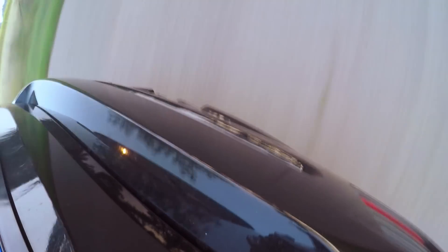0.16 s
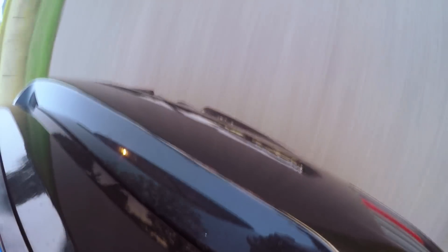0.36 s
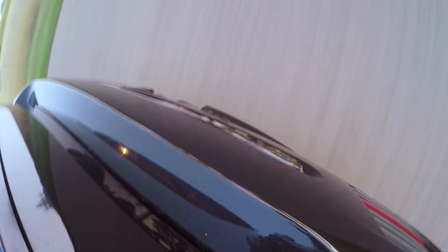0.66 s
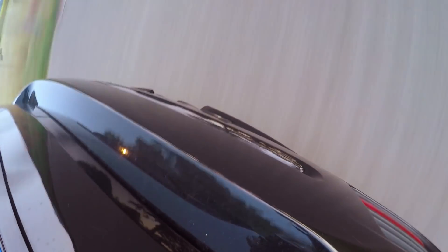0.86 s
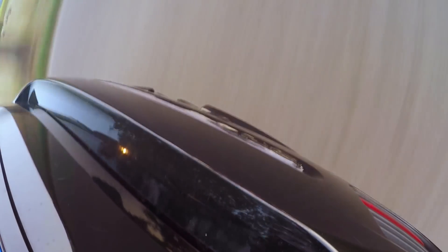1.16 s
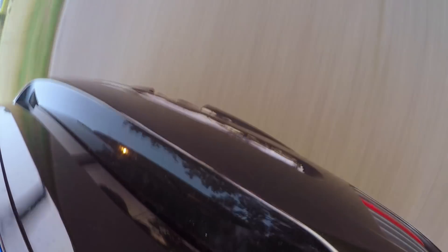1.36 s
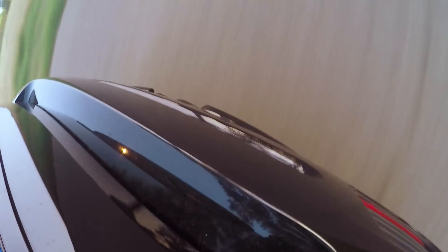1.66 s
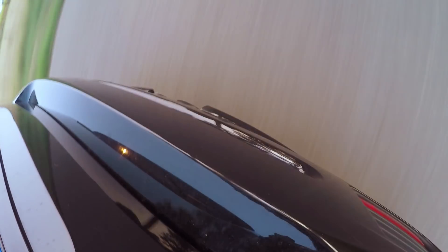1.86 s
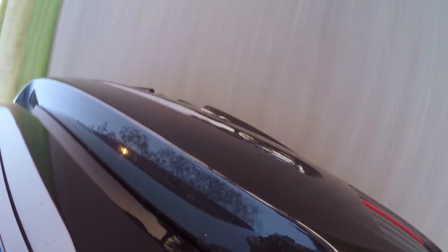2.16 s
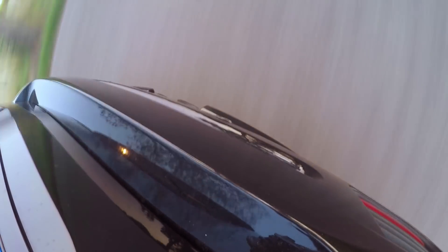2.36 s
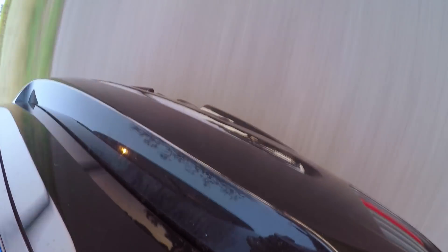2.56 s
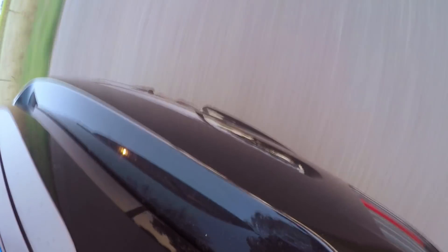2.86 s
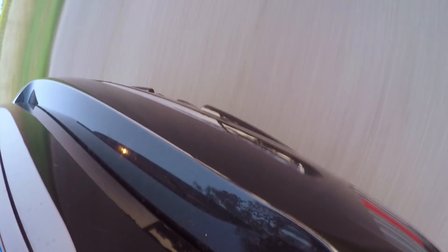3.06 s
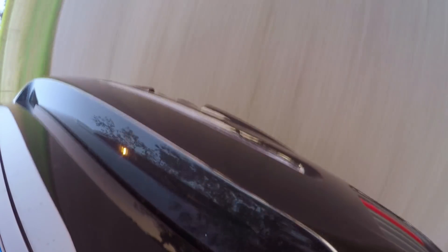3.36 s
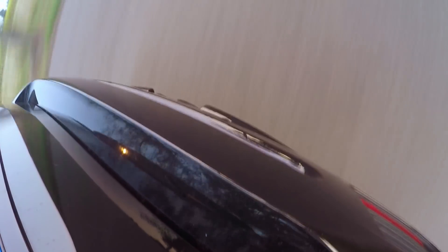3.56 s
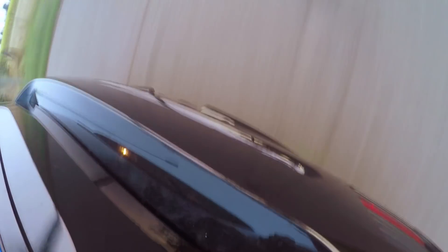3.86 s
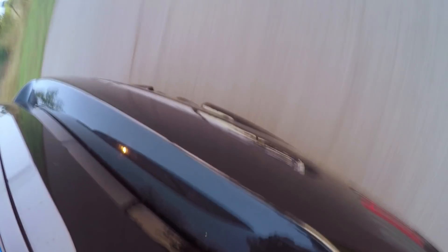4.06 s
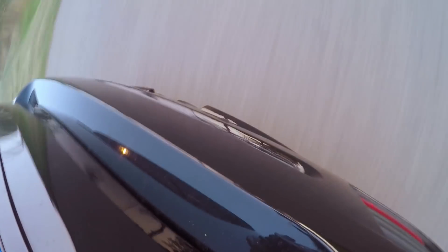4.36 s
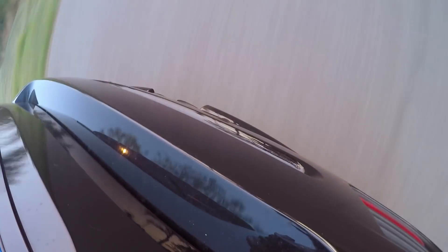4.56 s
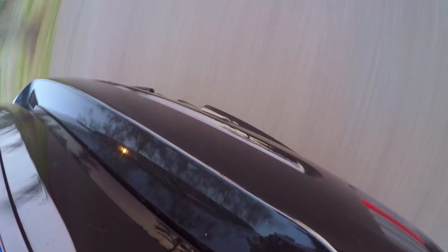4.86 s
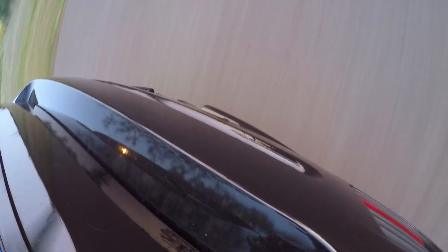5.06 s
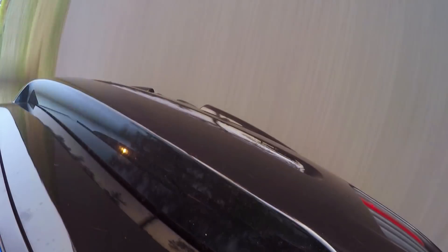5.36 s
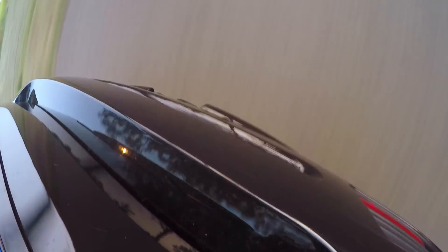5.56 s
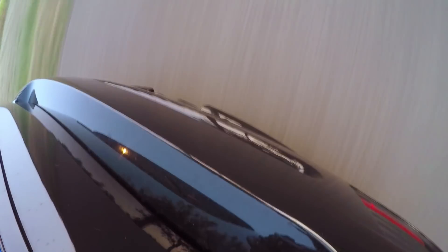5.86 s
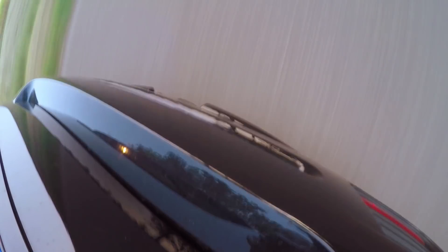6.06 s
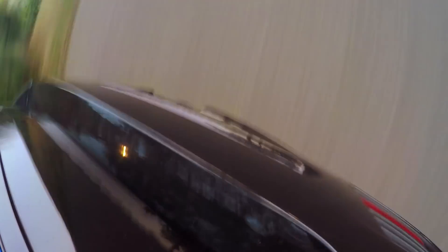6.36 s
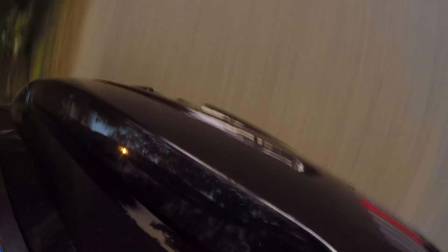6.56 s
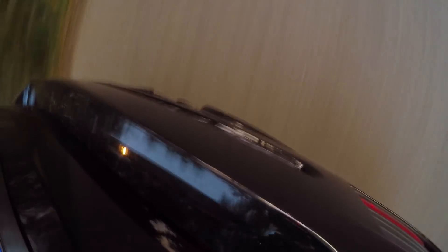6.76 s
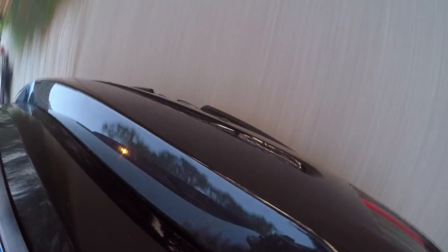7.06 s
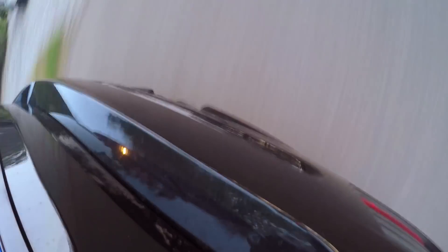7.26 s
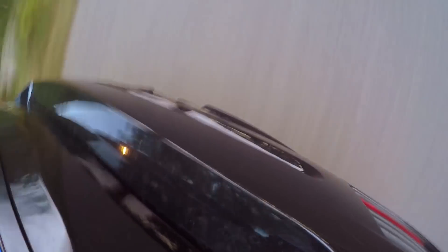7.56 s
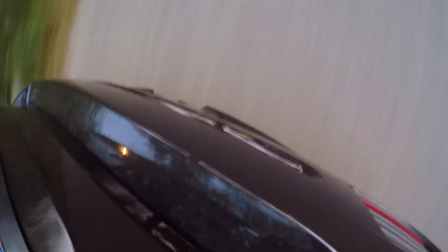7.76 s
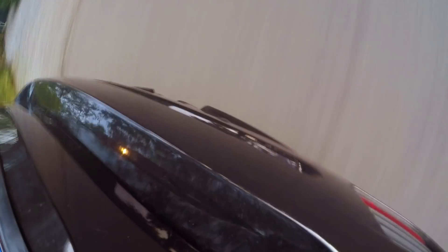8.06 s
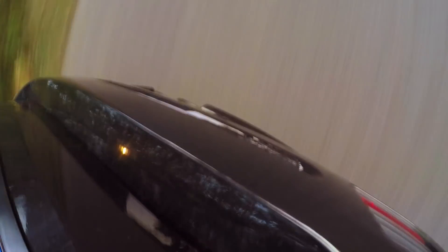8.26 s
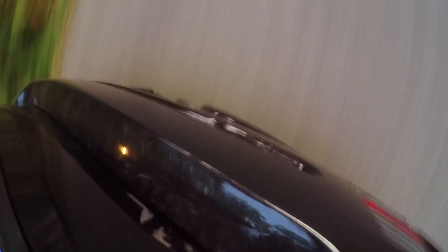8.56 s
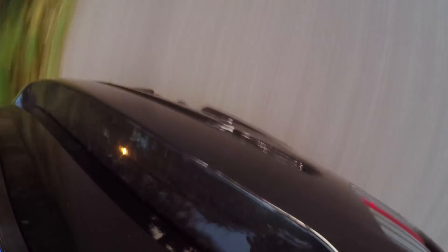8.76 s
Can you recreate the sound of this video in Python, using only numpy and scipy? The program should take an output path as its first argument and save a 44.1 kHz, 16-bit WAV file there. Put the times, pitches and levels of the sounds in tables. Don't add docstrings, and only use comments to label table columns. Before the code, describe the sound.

Outdoors on a road, the microphone sits at a small car's rear bumper. A deep smooth exhaust boom drones under heavy wind thumps, tyre roar and tiny grit ticks. Midway the engine loads up, with a faint rising turbine whistle, and the exhaust turns raspy and crackling as revs climb. It lifts off to a backfire, pulls again at lower pitch, and ends on another bang.

```python
import sys
import numpy as np
from scipy import signal
from scipy.io import wavfile
from scipy.ndimage import uniform_filter1d, map_coordinates

SR = 44100
rng = np.random.default_rng(int(sys.argv[2]) if len(sys.argv) > 2 else 0)


def field_ratio(decibels):
    return 10 ** (np.asarray(decibels, dtype=float) / 20)


def log_audio(samples):
    frames = np.atleast_2d(samples).T
    limited = np.clip(frames, -1, 1)
    pcm = np.round(limited * 32767).astype(np.int16)
    wavfile.write(sys.argv[1], SR, pcm)


N = 392481


def rms_one(x):
    return x / np.sqrt(np.mean(x ** 2) + 1e-20)


def in_time(rows):
    time_s, *columns = np.transpose(rows)
    return [np.interp(np.arange(N) / SR, time_s, column) for column in columns]


def drift(rate_hz):
    pole = np.exp(-80 * np.pi * rate_hz / SR)
    white = rng.standard_normal(N // 40 + 2002)
    slow = signal.lfilter([1], [1, -2 * pole, pole * pole], white)[2000:]
    return np.interp(np.arange(N) / 40, np.arange(len(slow)), rms_one(slow))


def ring(clicks, hz, t60_s):
    r, w = field_ratio(-60 / (t60_s * SR)), 2 * np.pi * hz / SR
    return signal.lfilter([0, np.sin(w)], [1, -2 * r * np.cos(w), r * r], clicks + 1e-18)


def fade(clicks, t60_s):
    return signal.lfilter([1], [1, -field_ratio(-60 / (t60_s * SR))], clicks + 1e-18)


def band(x, low_hz, high_hz):
    return signal.sosfilt(signal.butter(2, [low_hz, high_hz], "band", fs=SR, output="sos"), x)


def clicks_at(seconds, sizes):
    out = np.zeros(N)
    out[(np.asarray(seconds) * SR).astype(int)] = sizes
    return out


def coloured(spectrum, shared_db, own_db, rate_hz):
    hz, level_db = np.transpose(spectrum)
    edges_hz = hz[0] * 2 ** np.arange(0, np.log2(hz[-1] / hz[0]) + .1, .5)
    together, white = drift(rate_hz), rng.standard_normal((2, N))
    out = 0
    for k, (low, high) in enumerate(zip(edges_hz, edges_hz[1:])):
        centre_db = np.interp(np.log(low * high) / 2, np.log(hz), level_db)
        flicker_db = shared_db * together + own_db * drift(rate_hz)
        out = out + field_ratio(centre_db + flicker_db) * band(white[k % 2], low, high)
    return rms_one(out)


def air():
    # (time [s], wind [dB], tyres [dB])
    air_levels = [(0, -18.5, -38.5), (.8, -23, -41), (1.9, -22.5, -40), (2.5, -23, -43), (3.2, -21, -38.5),
                  (4.0, -24, -39), (4.7, -30, -42), (5.3, -25.5, -38.5), (6.3, -31.5, -47.5),
                  (6.7, -31, -49), (7.2, -27.5, -45), (7.9, -25, -33.5), (8.35, -34.5, -44.5),
                  (8.9, -28, -47)]
    # (time [s], peak [dB], width [s])
    gust_events = [(.24, -19, 0.028), (0.588, -17, 0.041), (0.711, -14.5, .06), (1.031, -12.5, 0.013),
                   (1.33, -36.5, 0.017), (1.46, -14.5, 0.063), (1.601, -23, 0.032), (1.95, -21, .05),
                   (2.099, -2.5, 0.023), (2.541, -23.5, 0.019), (2.67, -11.5, 0.014), (3.079, -38, 0.015),
                   (3.22, -16.5, 0.043), (3.619, -17, 0.057), (3.74, -23, 0.14), (4.44, -15, 0.04),
                   (5.701, -23, 0.045), (5.93, -16, 0.064), (6.17, -16.5, 0.047), (6.87, -18, 0.036),
                   (7.099, -18.5, 0.072), (7.33, -13.5, 0.022), (7.52, -19, 0.015), (7.869, -17, 0.018),
                   (8.1, -14.5, 0.015), (8.68, -9.5, 0.04), (8.87, -9, .03)]
    # (frequency [Hz], density [dB per Hz])
    buffet_spectrum = [(15, -18.5), (25, 6), (50, 3), (70, 2.5), (110, -6), (200, -48)]
    # (frequency [Hz], density [dB per Hz])
    flutter_spectrum = [(70, -21.5), (120, -6), (270, -7), (400, -10.5), (600, -31.5), (900, 6.5)]
    # (frequency [Hz], density [dB per Hz])
    tyre_spectrum = [(350, 15), (600, 2), (840, 3), (1220, 4.5), (2000, -3.5), (3300, -14.5), (4350, -20),
                     (6000, -28.5), (9000, -36.5), (15000, -40.5)]
    calm_db, flutter_db, flutter_follows, flutter_gust_db = -24, -34.5, 0.78, -20.5
    wind_db, tyre_db = in_time(air_levels)
    t = np.arange(N) / SR
    gusts = sum(field_ratio(peak_db) * np.exp(-abs(t - s) / width_s) for s, peak_db, width_s in gust_events)
    buffet = (field_ratio(wind_db + 2) + gusts) * coloured(buffet_spectrum, shared_db=2.0, own_db=1.0, rate_hz=42)
    flutter_gain = field_ratio(flutter_db + flutter_follows * (wind_db - calm_db)) + field_ratio(flutter_gust_db) * gusts
    flutter = field_ratio(6) * flutter_gain * coloured(flutter_spectrum, shared_db=3.5, own_db=2.0, rate_hz=57)
    tread = field_ratio(tyre_db - 17) * rms_one(ring(rng.standard_normal(N), hz=4270, t60_s=0.0087))
    roar = field_ratio(tyre_db + 9) * coloured(tyre_spectrum, shared_db=1.0, own_db=0.46, rate_hz=53)
    return buffet + flutter + tread + roar


def slaps():
    # (time [s], peak [dB], pitch [Hz], low push [dB])
    slap_events = [(0.136, 0, 202, -5.5), (0.256, -1, 148, -30), (0.357, 5.5, 174, -10),
                   (0.374, -4, 465, -2), (0.395, 0.5, 156, -26), (0.704, 1.5, 166, -10),
                   (1.029, 0, 300, -22), (1.399, -8, 294, -17), (1.449, -10, 396.7, -12),
                   (1.524, -2, 191, -15), (1.591, -6, 174, -28.5), (2.081, -17, 147, -18),
                   (2.08, -4.5, 346, -21), (6.165, -5, 300, -24), (2.306, -10, 258, -28),
                   (2.647, 0.5, 235, -10.5), (2.701, -2.5, 191.7, -17), (2.908, -11, 152, -33),
                   (3.183, 1, 242, 0.5), (3.285, -12, 150, -16), (5.948, -7.5, 219, -24),
                   (3.613, -5, 210, -12), (3.704, -15, 239, -26), (4.427, -28, 186.9, -25),
                   (4.847, -1.5, 180, -22), (6.988, -3, 150.5, -4.5), (7.108, -8, 229.5, -21),
                   (8.679, -4.5, 168, -7), (8.83, -3, 151, -19)]
    out = np.zeros(N)
    for s, peak_db, hz, push_db in slap_events:
        start = int(s * SR)
        hit = np.eye(1, 4000)[0]
        ragged = 0.058 * fade(hit, 0.13) * rng.standard_normal(4000)
        burst = field_ratio(peak_db - 2.0) * ring(hit + ragged, hz, 0.015)
        push = field_ratio(push_db) * ring(hit, 35, 0.14)
        out[start:start + 4000] += (burst + push)[:N - start]
    return band(out, 5.3, 1700)


def grit():
    # (time [s], peak [dB], low part [dB])
    grit_events = [(0.0667, -33, -7), (0.55, -47, -9), (1.243, -32, -22), (1.3658, -38, -7),
                   (1.468, -18.5, -9), (1.6122, -35, -17), (1.6432, -34.5, -7), (1.745, -42, -7),
                   (1.773, -37, -9), (1.866, -26, -17), (1.9694, -36, -14), (3.062, -53, -12),
                   (3.1512, -42, 2)]
    s, peak_db, low_db = np.transpose(grit_events)
    noise = rng.standard_normal(N)
    bright = band(fade(clicks_at(s, field_ratio(peak_db)), 0.011) * noise, 5500, 15500)
    low = band(fade(clicks_at(s, field_ratio(peak_db + low_db)), 0.016) * noise, 4000, 7300)
    return 0.7 * bright + 2.1 * low


def backfires():
    # (time [s], peak [dB], brightness [dB], pipe ring t60 [s])
    bang_events = [
        (6.802, -5, 0, .045),
        (8.882, -5, 2, .016),
    ]
    out = np.zeros(N)
    for s, peak_db, bright_db, t60_s in bang_events:
        bang, noise = clicks_at([s], field_ratio(peak_db)), rng.standard_normal(N)
        crackle = .6 * band(fade(bang, .03) * noise, 2500, 5500)
        shock = field_ratio(bright_db) * (3 * ring(bang, 3800, .0025) + crackle)
        pipe_ring = 2.0 * ring(-bang, 770, t60_s) + ring(-bang, 950, t60_s) + .4 * ring(bang, 400, t60_s)
        hiss = .95 * band(fade(bang, .075) * noise, 300, 3200)
        hiss += .06 * band(fade(bang, .06) * noise[::-1], 4500, 14000)
        recoil = clicks_at([s + .006], field_ratio(peak_db))
        swing = 1.2 * ring(bang, 70, .1) - 1.3 * ring(recoil, 62, .07)
        out += shock + pipe_ring + hiss + swing
    return out


def whistle(at_s):
    # (time [s], pitch [Hz], level [dB])
    spool = [
        (3.7, 6100, -76),
        (3.85, 6500, -56),
        (3.95, 6950, -48),
        (4.03, 7900, -60),
        (4.1, 9200, -61),
        (4.3, 9700, -68),
        (4.45, 10000, -120),
    ]
    hz, level_db = in_time(spool)
    sizes = field_ratio(1.8 * rng.standard_normal(len(at_s)))
    puffs = uniform_filter1d(fade(clicks_at(at_s, sizes), 0.07), size=150)
    breath = rms_one(band(rng.standard_normal(N), 20, 700))
    return 6.3 * field_ratio(level_db) * puffs * breath * np.sin(2 * np.pi * np.cumsum(hz) / SR)


def exhaust_boom(turns):
    # (time [s], level [dB])
    boom_levels = [(0, -16), (.22, -13.5), (.7, -15), (1.28, -12), (2.0, -12.5), (2.46, -13), (3.15, -12),
                   (3.38, -15), (4.45, -10.5), (4.9, -12), (6.31, -13.5), (6.48, -30.5), (6.8, -21.5),
                   (6.95, -23), (7.3, -12), (8.3, -11), (8.7, -24.5), (8.9, -27.5)]
    swing = np.sin(2 * np.pi * turns) + field_ratio(-22.5) * np.sin(np.pi * turns)
    level_db = in_time(boom_levels)[0] + 0.35 * drift(32)
    return np.sqrt(2) * field_ratio(level_db) * swing


def firing_strengths(at_s):
    cylinder_db = [
        [2.4, -1.2, .7, -2],
        [0, -1.5, -2.2, 4.2],
        [5, -1, -5.5, 1.5],
    ]
    # (time [s], row of the cylinder table)
    throttle = [(4.3, 0), (4.45, 1), (4.85, 1), (5, 0), (5.4, 0), (5.55, 1), (6.1, 1), (6.23, 2), (6.6, 2),
                (7.0, 0), (7.8, 0), (7.81, 0), (8.15, 2)]
    # (time [s], extra [dB])
    hard_firings = [(4.426, 0), (6.257, 4.5), (6.267, -1.5), (6.286, 3), (6.296, 7.5), (6.324, -2.5),
                    (6.334, 7), (6.363, 5.5), (6.372, 9), (8.35, -2.5), (8.394, 1.5), (8.439, 4),
                    (8.472, 4), (8.517, 3)]
    place = [np.interp(at_s, *np.transpose(throttle)), np.arange(len(at_s)) % 4]
    strength_db = map_coordinates(np.array(cylinder_db, float), place, order=1)
    strength_db = strength_db + 0.94 * rng.standard_normal(len(at_s))
    edge_db = .9 * strength_db
    for s, extra_db in hard_firings:
        nearest = np.argmin(abs(at_s - s))
        edge_db[nearest] += 1.7 * extra_db
        strength_db[nearest] += extra_db
    return strength_db, edge_db


def pipe(at_s, strength_db, modes, scatter_db, puff, tail, soft_hz):
    out = np.zeros(N)
    for hz, level_db, t60_s in modes:
        scatter = scatter_db * rng.standard_normal(len(at_s))
        clicks = clicks_at(at_s, field_ratio(strength_db + level_db + scatter))
        gas = puff * fade(clicks, .008) + tail * fade(clicks, .08)
        gas = uniform_filter1d(gas, size=30, origin=14)
        out += ring(gas * rng.standard_normal(N) - clicks, hz, t60_s)
    return rms_one(signal.sosfilt(signal.butter(2, soft_hz, fs=SR, output="sos"), out))


def surges():
    # (time [s], length [s], bark [dB], rasp [dB], crack [dB])
    spells = [
        (4.42, 0.18, 10.5, 12.5, 5),
        (4.635, 0.34, 6.5, -2.5, 1.4),
        (6.268, 0.071, 4.7, 4.5, 5.5),
        (8.205, 0.51, 1.5, 9, 2.5),
    ]
    edge_s = .035
    t = np.arange(N) / SR
    total_db = 0
    for s, length_s, *extra_db in spells:
        shape = np.interp(t, [s - edge_s, s, s + length_s, s + length_s + edge_s], [0, 1, 1, 0])
        total_db = total_db + np.outer(extra_db, shape)
    return total_db


def load_levels():
    # (time [s], level [dB])
    load_curve = [(3.35, -73.5), (3.5, -42.5), (4.0, -35.5), (4.1, -31.5), (4.4, -30.5), (4.68, -33.5),
                  (5.0, -35.5), (5.5, -24), (6.23, -23.5), (6.37, -30.5), (6.45, -46.5), (6.6, -81.5),
                  (6.95, -70), (7.1, -41), (8.1, -25), (8.46, -26.5), (8.54, -40), (8.65, -63)]
    full_load_db = -24
    load_db = in_time(load_curve)[0] - full_load_db
    follow_db = [-17 + 0.87 * load_db, -30 + 0.68 * load_db, full_load_db + load_db]
    bark_db, rasp_db, crack_db = uniform_filter1d(follow_db + surges(), size=1500)
    hot_db = -29 + 1.42 * (crack_db - full_load_db)
    return bark_db, rasp_db, crack_db, hot_db


def off_road(x):
    # (time [s], lag [ms])
    echo_lags = [(3.5, 1.125), (3.8, 1.1), (4.12, 1.01), (4.45, 1.125), (4.9, 1.015), (5.25, 1.095),
                 (5.58, .99), (5.8, 1.065), (6.0, .94), (6.3, .995), (7.2, 1.11), (7.8, 1.0), (7.97, 1.065),
                 (8.22, 1.0), (8.55, 1.11), (8.88, 1.16)]
    read = np.arange(N) - in_time(echo_lags)[0] * SR / 1000
    dull = signal.sosfiltfilt(signal.butter(2, 5500, fs=SR, output="sos"), x)
    return x + field_ratio(-2) * map_coordinates(dull, [read], order=3)


def engine():
    # (time [s], firing rate [Hz])
    speed = [(0.0, 85.68), (1.4, 80.92), (2.35, 77.55), (2.45, 78.62), (2.8, 76.73), (3.5, 76.48),
             (4.25, 80.89), (4.95, 87.25), (5.2, 90.49), (5.75, 98.32), (6.2, 105.59), (6.45, 103.03),
             (6.6, 101.94), (7.05, 81.28), (7.75, 85.55), (8.2, 90.01), (8.75, 89.75), (8.9, 84.0)]
    # (frequency [Hz], level [dB], t60 [s])
    bark_modes = [(180, -10.5, 0.1), (300, -6.5, 0.06), (440, 14, 0.008)]
    # (frequency [Hz], level [dB], t60 [s])
    rasp_modes = [(825, 22.5, 0.0061)]
    # (frequency [Hz], level [dB], t60 [s])
    crack_modes = [(2180, 5.5, 0.0025), (3210, -0.5, 0.0026), (4570, -6, 0.0035)]
    # (frequency [Hz], level [dB], t60 [s])
    sizzle_modes = [(6700, 3, 0.0011), (9100, -5, 0.0012), (13000, -11, .0012)]
    hot_modes = [(1040, 0, 0.0062)]
    firing_hz, = in_time(speed)
    turns = .41 + np.cumsum(firing_hz) / SR
    lead = .125 + .012 * np.maximum(firing_hz - 92, 0)
    at_s = np.nonzero(np.diff(np.floor(turns + lead)))[0] / SR
    jittered_s = np.clip(at_s + 1.2e-4 * rng.standard_normal(len(at_s)), 0, at_s[-1])
    strength_db, edge_db = firing_strengths(at_s)

    bark = pipe(at_s, .1 * strength_db, bark_modes, scatter_db=2.2, puff=.005, tail=.012, soft_hz=1500)
    rasp = pipe(jittered_s, .7 * strength_db, rasp_modes, scatter_db=1, puff=.035, tail=.009, soft_hz=1800)
    hot = pipe(jittered_s, .8 * strength_db, hot_modes, scatter_db=1.2, puff=.045, tail=.012, soft_hz=1800)
    crack = pipe(jittered_s, strength_db, crack_modes, scatter_db=1.2, puff=.11, tail=.022, soft_hz=6000)
    sizzle = pipe(jittered_s, edge_db, sizzle_modes, scatter_db=2, puff=5, tail=2.2, soft_hz=15000)

    bark_db, rasp_db, crack_db, hot_db = load_levels()
    deep = exhaust_boom(turns) + field_ratio(bark_db) * bark
    sharp = whistle(at_s[::2]) + field_ratio(hot_db) * hot
    sharp += field_ratio(rasp_db) * rasp + field_ratio(crack_db) * crack
    sharp += field_ratio(0.84 * crack_db - 24) * sizzle
    return deep + off_road(sharp)


def scene():
    return (air() + slaps() + grit() + backfires() + engine())[None]


def top_cut(x):
    return signal.sosfilt(signal.butter(12, 16310, fs=SR, output="sos"), x)


def record(dry):
    low_pass = signal.cheby2(10, 50, 16000, fs=SR, output="sos")
    clipped = signal.sosfilt(low_pass, np.clip(dry, -1, 1))
    return top_cut(np.clip(clipped - clipped.mean(), -1, 1))


dry = scene()
out = record(dry)
log_audio(out)
```